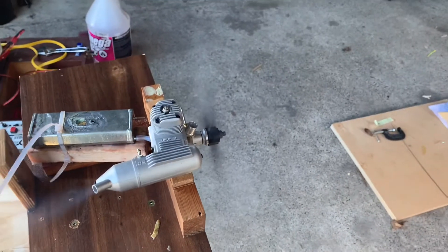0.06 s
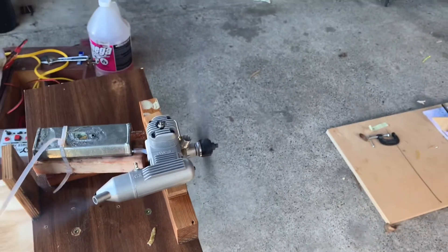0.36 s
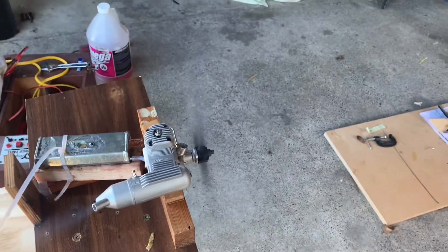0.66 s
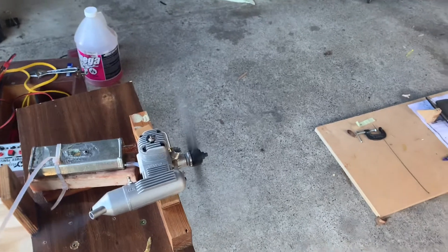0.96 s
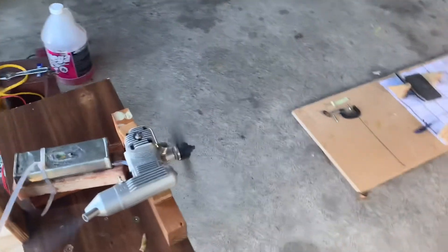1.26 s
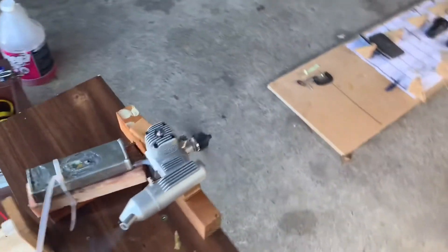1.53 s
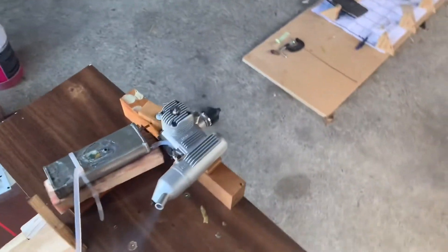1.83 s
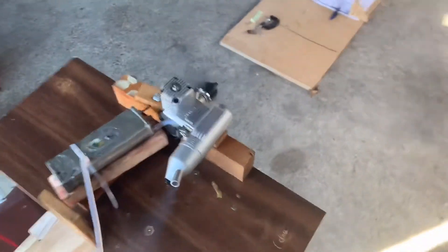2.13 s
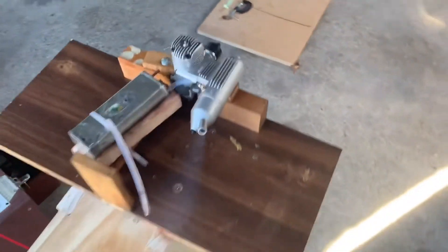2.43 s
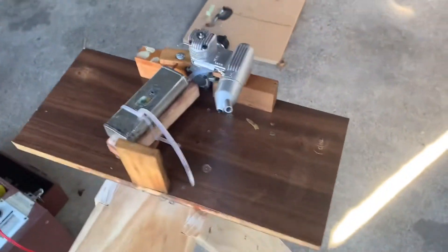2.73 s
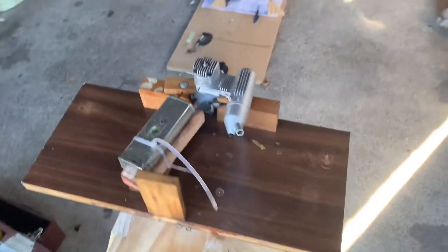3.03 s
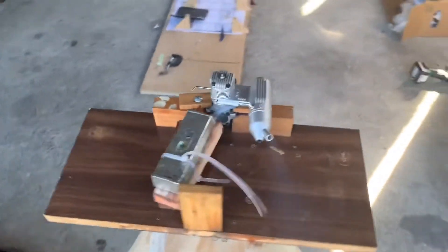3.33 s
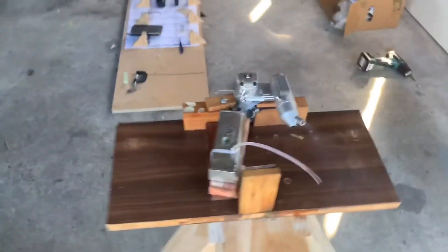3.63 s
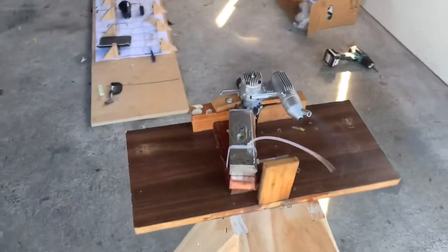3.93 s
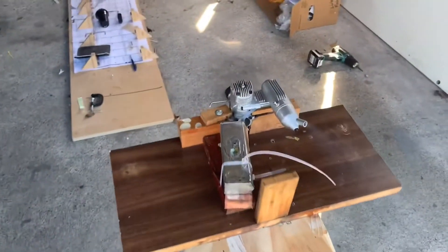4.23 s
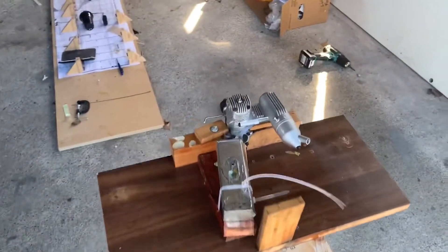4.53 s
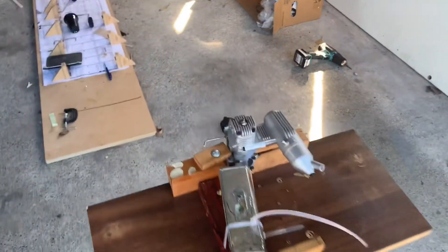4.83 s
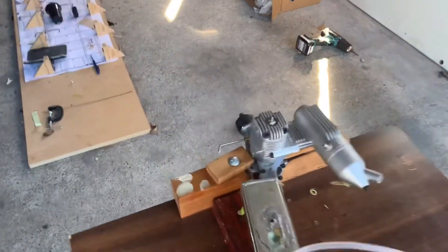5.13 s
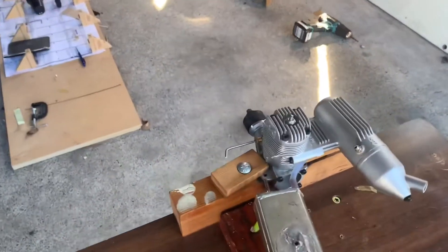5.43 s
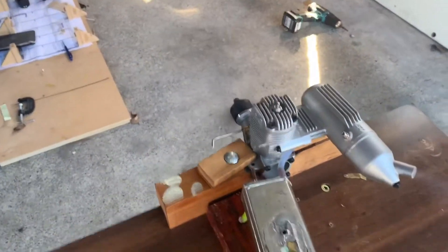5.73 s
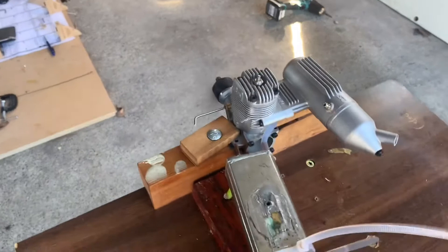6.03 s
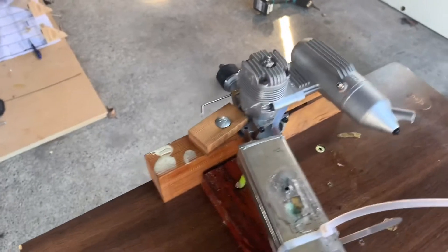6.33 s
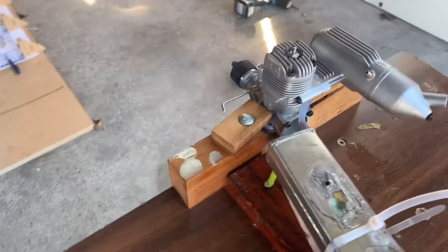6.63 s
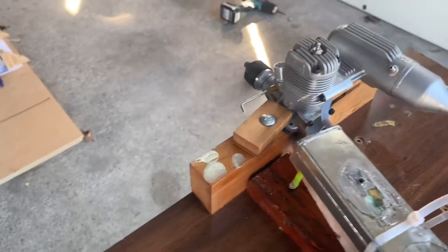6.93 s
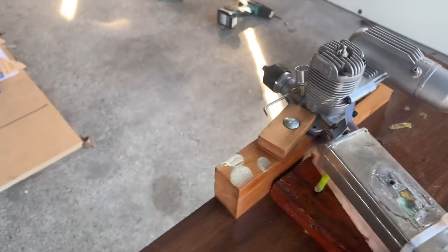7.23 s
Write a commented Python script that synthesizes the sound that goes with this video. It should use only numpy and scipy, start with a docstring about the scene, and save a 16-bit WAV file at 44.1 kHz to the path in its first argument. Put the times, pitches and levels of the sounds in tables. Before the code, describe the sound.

A little propeller engine buzzes loudly and continuously, its rapid exhaust pops slightly uneven and its pitch barely wavering. Bright hiss rides on top, with a short garage echo around it. As the listener walks from its side to its rear, the sound briefly sharpens, then takes on a metallic edge. Near the end the microphone leans in, and the drone becomes fuller and louder, with light buffeting from the propeller's air.

```python
"""A small two-stroke model engine spins a two-blade propeller on a board in a garage, 150 turns a second.
From the start it runs rich (too much fuel): strong and weak firings tend to alternate, each with an
exhaust pop and a spit of hiss. The listener sets off from beside it, passing a sizzle and a hard crack
just before 2 s. Further round the crack turns metallic. From about 5 s the listener leans in close
behind, where the blades hum louder and their wind buffets the microphone."""
import sys
import numpy as np
from scipy import signal
from scipy.fft import rfft, irfft, next_fast_len
from scipy.io import wavfile
from scipy.ndimage import uniform_filter1d, map_coordinates

SR = 44100
rng = np.random.default_rng(int(sys.argv[2]) if len(sys.argv) > 2 else 0)


def transcribe(u):
    """Save the signal u as a 16-bit wav file named by the first command-line argument.

    u: samples, shape (n,) or (channels, n), limited to [-1, 1]; the rate is SR.
    q: integer samples, one column per channel.
    """
    v = np.clip(np.atleast_2d(u).T, -1, 1)
    q = np.round(v * 32767).astype(np.int16)
    wavfile.write(sys.argv[1], SR, q)


N = 324576
LEFT_RIGHT = np.array([[.5], [-.5]])  # shares out a difference: half up on the left, half down on the right


def amp(db):
    """Turn decibels into a gain."""
    return 10 ** (np.asarray(db) / 20)

def unit(x):
    """Scale to an average (rms) size of 1."""
    return x / np.sqrt(np.mean(x ** 2) + 1e-20)

def steady(x, size=8192):
    """Hold the slowly changing level of x at rms 1."""
    return x / np.sqrt(abs(uniform_filter1d(np.mean(x ** 2, axis=0), size)) + 1e-12)

def past(x, edge, span):
    """A soft step from 0 to 1 as x passes the edge."""
    return (1 + np.tanh((x - edge) / span)) / 2

def along(points, hz):
    """Read a frequency table between its rows, on a log scale."""
    f, v = np.transpose(points)
    return np.interp(np.log(hz + 1), np.log(f + 1), v)

def curves(rows):
    """Read a time table: one value per sample for each column after the time."""
    s, *cols = np.transpose(rows)
    return [np.interp(np.arange(N) / SR, s, c) for c in cols]

def wobble(rate):
    """A smooth random curve through `rate` points a second."""
    return map_coordinates(rng.standard_normal(int(N * rate / SR) + 4), [np.arange(N) * rate / SR])

def delayed(x, ms):
    """Delay a mono sound by a changing amount."""
    return map_coordinates(x, [np.arange(N) - ms * SR / 1000], order=3)

def filtered(x, response):
    """Multiply each frequency in x by response(hz)."""
    m = next_fast_len(N + SR // 2)
    return irfft(rfft(x, m) * response(np.fft.rfftfreq(m, 1 / SR)), m)[..., :N]

def coloured(x, spectrum, size=8192):
    """Give x a tone colour, with a filter that rings after each hit and never before."""
    cepstrum = irfft(np.log(amp(along(spectrum, np.fft.rfftfreq(size, 1 / SR)))))
    cepstrum[1:size // 2] *= 2
    cepstrum[size // 2 + 1:] = 0
    return signal.fftconvolve(x, irfft(np.exp(rfft(cepstrum)))[None], axes=1)[:, :N]

def pulses(at, sizes, order=8):
    """Clicks at positions that may fall between samples."""
    taps = np.floor(at)[:, None].astype(int) + np.arange(1 - order, order + 1)
    off = taps - at[:, None]
    shape = sizes[:, None] * np.sinc(off) * np.cos(np.pi * off / (2 * order)) ** 2
    return np.bincount(np.clip(taps, 0, N).ravel(), shape.ravel(), N + 1)[:N]


# the listener's path: (time [s], angle round the engine from its side [degrees], distance [m])
WALK = [(0, -8, 0.58), (.7, 3, 0.69), (2.1, 46.5, 0.57), (2.75, 52, 0.61), (3.7, 91, 0.75),
        (4.6, 91.5, 0.64), (5.4, 113, 0.42), (6.5, 123, 0.42), (7.36, 125, 0.41)]

def viewpoint():
    """The listener's angle in degrees, and nearness in dB (0 at half a metre)."""
    angle, distance = curves(WALK)
    return angle, 20 * np.log10(0.5 / distance)

def views():
    """How much the listener is beside, diagonally behind, behind and close behind the engine."""
    angle = viewpoint()[0]
    beside = 1 - past(angle, 45.6, 0.37)
    rear, close = past(angle, 78, 13), past(angle, 93, 7.3)
    return [beside, 1 - beside - rear, rear - close, close]

def beam(best_deg, width_deg):
    """How far the listener stands inside a narrow beam of sound, 0 to 1."""
    return np.exp(-((viewpoint()[0] - best_deg) / width_deg) ** 2)


# the exhaust outlet drifts from left to right: (time [s], head start of the left side [ms])
OUTLET_LEAD = [(0, .17), (1.4, 0.17), (2.1, 0.12), (2.7, 0.078), (3.6, 0.036), (4.8, 0.044), (5.4, -0.058),
               (7.36, -0.044)]

def from_outlet(x):
    """Sound from the outlet reaches the nearer ear first."""
    lead_ms, = curves(OUTLET_LEAD)
    return np.array([delayed(x, -lead_ms / 2), delayed(x, lead_ms / 2)])


# how long the garage echoes: (frequency [Hz], time to fade by 60 dB [s])
ECHO_TIME = [(150, 0.069), (1500, 0.44), (6000, 0.26), (14000, 0.022)]

def garage(x, wet_db, count):
    """The direct sound plus the walls' echo, which blends through `count` spots along the walk."""
    hz, t, noise = signal.stft(rng.standard_normal((count, 2, SR // 3)), SR, nperseg=256)
    tails = signal.istft(noise * amp(-60 * t / along(ECHO_TIME, hz)[:, None]), SR)[1]
    place = np.linspace(0, count - 1, N)
    echo = 0
    for k, tail in enumerate(tails):
        share = np.sqrt(np.clip(1 - abs(place - k), 0, 1))
        echo = echo + share * signal.oaconvolve(x[None], tail / np.linalg.norm(tail[0]), axes=1)[:, :N]
    return x + amp(wet_db) * echo


# the rich mixture makes the speed wander: (time [s], speed [turns per second])
SHAFT_SPEED = [(0.0, 148.0), (0.08, 149.8), (0.17, 147.5), (0.23, 147.4), (0.28, 149.8), (0.35, 149.9),
               (0.41, 148.8), (0.53, 149.0), (0.71, 151.3), (0.8, 149.8), (0.9, 149.8), (1.0, 146.2),
               (1.04, 148.0), (1.17, 148.3), (1.32, 152.2), (1.35, 149.1), (1.41, 148.5), (1.48, 148.9),
               (1.55, 151.2), (1.62, 149.8), (1.71, 150.1), (1.75, 147.4), (1.82, 149.8), (1.86, 148.9),
               (2.01, 150.3), (2.1, 147.5), (2.17, 147.7), (2.21, 150.7), (2.29, 149.8), (2.36, 150.6),
               (2.41, 149.3), (2.47, 150.9), (2.58, 148.8), (2.68, 148.8), (2.72, 147.5), (2.8, 150.6),
               (2.85, 150.9), (2.92, 148.7), (3.04, 150.9), (3.23, 148.2), (3.31, 149.3), (3.37, 148.2),
               (3.42, 149.5), (3.56, 148.2), (3.68, 149.7), (3.8, 149.4), (3.85, 150.2), (3.95, 150.3),
               (4.01, 151.8), (4.11, 149.7), (4.22, 151.6), (4.28, 148.8), (4.35, 148.7), (4.44, 152.2),
               (4.5, 149.7), (4.6, 150.0), (4.64, 147.9), (4.74, 151.7), (4.87, 149.4), (4.97, 151.7),
               (5.05, 149.8), (5.11, 151.5), (5.28, 147.1), (5.37, 147.8), (5.49, 151.4), (5.64, 148.5),
               (5.69, 148.6), (5.84, 151.0), (5.9, 149.2), (5.95, 150.1), (5.99, 147.5), (6.1, 151.2),
               (6.17, 149.6), (6.21, 147.2), (6.36, 150.3), (6.45, 148.4), (6.56, 150.8), (6.6, 149.9),
               (6.77, 151.6), (6.91, 150.9), (6.98, 146.5), (7.05, 148.6), (7.26, 152.3), (7.36, 148.1)]

def shaft():
    """The shaft's speed, and its running count of turns with a slight jitter."""
    speed, = curves(SHAFT_SPEED)
    return speed, np.cumsum(speed * (1 + 0.001223 * wobble(40))) / SR

def firings(turns, swap_rate=2.5, seesaw_share=0.66, chance=0.52):
    """One burn a turn: its position in samples and its strength (above 0 strong, below 0 weak)."""
    at = np.interp(np.arange(1, int(turns[-1])), turns, np.arange(N))
    # a strong burn leaves spent gas that weakens the next; now and then the pattern slips by one turn
    seesaw = np.cos(np.pi * np.arange(len(at))) * np.tanh(3 * wobble(swap_rate))[at.astype(int)]
    luck = rng.standard_normal(N // 100)[:len(at)]
    return at, unit(np.tanh(seesaw_share * seesaw + chance * luck))  # one charge of fuel caps a burn


# Tone k has k cycles per turn. The levels in these tables are relative: the mix shifts them.
# tone 2, the blades' hum, swells close behind the propeller: (time [s], level [dB])
BLADE_HUM = [(0, -34), (1.15, -34), (1.8, -43.5), (3.0, -39), (4.0, -44.5), (4.7, -35.5), (5.1, -24.5),
             (6.3, -22), (7.36, -18.5)]
# tone 4, the muffler's hoot: (time [s], level [dB])
MUFFLER_HOOT = [(0, -31.5), (.7, -33.5), (2.0, -31), (2.35, -28), (2.8, -30.5), (4.6, -26.2), (5.5, -22.5),
                (6.7, -22.5), (7.36, -25)]
# tones 3, 5 and 6 cross the garage's loud and quiet spots (standing waves): (time [s], level [dB])
TONE_3 = [(0.0, -38.5), (0.7, -37.5), (1.14, -43), (1.28, -37.5), (2.12, -38.5), (2.49, -34.5),
          (3.35, -37.5), (4.61, -39.5), (5.01, -45), (5.27, -38.5), (5.99, -38.5), (6.45, -39.0),
          (6.8, -54), (7.06, -40.0), (7.34, -55)]
TONE_5 = [(0.0, -33.5), (0.42, -42), (0.74, -38), (1.3, -38.5), (1.519, -41.5), (2.35, -49), (2.59, -39),
          (2.81, -42), (3.57, -34.5), (4.37, -34), (4.83, -38.5), (5.41, -31), (6.23, -31), (7.34, -33)]
TONE_6 = [(0.0, -37), (0.6, -39.5), (0.84, -40.5), (1.92, -31.5), (2.57, -41), (2.77, -35), (3.31, -36),
          (3.67, -44), (4.13, -41), (4.33, -57), (4.51, -42), (4.809, -37.5), (5.148, -39), (5.33, -54),
          (5.79, -37), (6.27, -49), (6.6, -39), (7.34, -34)]
# standing waves make the left louder than the right by this much:
# (time [s], tone 2 [dB], tones 3, 4 and 6 [dB], tone 5 [dB])
TONE_BALANCE = [(0.0, 0.5, 13, 7.6), (1.4, 1, 12, 2), (2.0, -10, 10.5, 1), (2.5, -12, 2, 1),
                (3.0, -20, 0, 1.8), (3.6, -5, 0, 0.98), (4.4, 5, -3, 2.1), (5.0, 5.5, -0.5, 1.8),
                (5.6, 8, -2, 1.297), (6.4, 7, -3.5, 2.7), (7.36, 3, -9.5, 4.4)]

def drone(turns, speed, at, burn, flutter_db=0.65, throb_db=0.94):
    """Exhaust and propeller hum six pure tones; those above the blades' hum throb with the burns."""
    angle, near_db = viewpoint()
    thrum_db = -32.5 + 1.96 * near_db + 2.5 * np.cos(2 * np.pi * (angle - 12) / 168)  # tone 1: a wide beam
    levels = [thrum_db] + [curves(rows)[0] for rows in (BLADE_HUM, TONE_3, MUFFLER_HOOT, TONE_5, TONE_6)]
    blade_pan, exhaust_pan, fifth_pan = curves(TONE_BALANCE)
    pans = [0, blade_pan, exhaust_pan, exhaust_pan, fifth_pan, exhaust_pan]
    lead_ms = 0.032 + 0.198 * views()[0]  # the left ear's head start is longest beside the engine
    burn_now = np.interp(np.arange(N), at, burn)
    hum = 0
    for k, (db, pan) in enumerate(zip(levels, pans), 1):
        # shorter waves differ more between the two ears
        apart = k * (2 * np.pi * speed * lead_ms / 1000 + 0.11 * wobble(0.94))
        phase = 2 * np.pi * (k * turns + rng.random()) + LEFT_RIGHT * apart
        balance = amp(LEFT_RIGHT * pan) / np.sqrt((amp(pan) + amp(-pan)) / 2)
        gain = amp(db + flutter_db * wobble(90) + (k > 2) * throb_db * burn_now)
        hum = hum + np.sqrt(2) * gain * balance * np.sin(phase)
    return hum


# the deep ring of muffler and board: (frequency [Hz], level [dB])
BOOM_COLOUR = [(30, -32), (72, -4.5), (125, -1), (190, -6.5), (225, 2), (290, -3), (370, -8), (520, 1),
               (670, 0), (830, -5.5), (980, -5), (1130, -18), (2000, -40)]

def boom(at, burn):
    """Uneven burns thump the board, sounding at half the shaft's rate."""
    return steady(coloured(garage(pulses(at, burn), wet_db=-23.5, count=3), BOOM_COLOUR))


# the muffler's ring from four sides: (frequency [Hz], level [dB])
MUFFLER_BESIDE = [(560, -41), (950, 17.5), (1060, -1.5), (1190, 3), (1350, 2.5), (1500, -0.5), (1640, -4.5),
                  (1930, 6.5), (2260, -0.5), (2550, 0.5), (2700, -7), (2860, -1.5), (3320, -8.5),
                  (4200, -6.5), (5460, -33), (9240, -120)]
MUFFLER_DIAGONAL = [(560, -43), (950, -2), (1200, 1), (1480, 4), (1650, -5), (1830, 4.5), (2100, -1.5),
                    (2400, 4), (2550, -18), (2680, 5), (2860, 0.5), (2990, -23), (3140, 1), (3500, -23),
                    (5200, -21), (8800, -120)]
MUFFLER_BEHIND = [(560, -36), (950, -7), (1050, -11), (1200, 0.5), (1340, 3), (1510, 10.5), (1800, -1.5),
                  (2090, 4), (2250, -24), (2400, -1), (2550, -14), (2860, 8), (3000, -8), (3300, 1.5),
                  (4000, -23), (5200, -24), (8800, -120)]
MUFFLER_CLOSE = [(560, -40.5), (950, 0), (1050, -4.5), (1340, -7), (1520, 6), (1670, 2), (1910, -9),
                 (2110, 0.5), (2260, -15.5), (2400, -3.5), (2670, -11), (2860, -2.5), (3000, -19.5),
                 (3150, -5.5), (3300, -5.5), (4000, -22), (5200, -40), (8800, -120)]

def exhaust_pops(at, burn, uneven_db=1.1, low_cut_hz=985):
    """A sharp pop each time the exhaust port opens, ringing in the muffler."""
    shares = views()
    pops = pulses(at, amp(uneven_db * burn))
    walls = garage(pops, wet_db=-10.5, count=5) - pops
    heard = filtered(from_outlet(pops) + walls, lambda hz: past(hz, low_cut_hz, 50))
    colours = [MUFFLER_BESIDE, MUFFLER_DIAGONAL, MUFFLER_BEHIND, MUFFLER_CLOSE]
    ringing = sum(share * unit(coloured(heard, colour)) for share, colour in zip(shares, colours))
    side_gain = amp(shares[0] * (-2 + 2.5 * LEFT_RIGHT))  # from beside: softer, and more to the left
    return side_gain * steady(ringing) * amp(1.6 * LEFT_RIGHT)


# the pops' low range, a bark: (time [s], relative level [dB])
BARK_LEVEL = [(0.0, -37.5), (0.16, -40.5), (0.66, -39), (0.96, -42), (1.06, -40.5), (1.54, -37.5),
              (2.2, -39), (2.75, -39), (3.53, -45.5), (4.15, -46), (4.49, -47.5), (4.81, -41.5),
              (5.27, -44), (5.49, -36), (5.65, -46), (5.85, -37.5), (5.99, -42), (6.09, -36), (6.25, -42),
              (6.66, -35.5), (6.98, -40), (7.12, -37), (7.34, -41)]
# the pops' middle range, a nasal whine: (time [s], relative level [dB])
WHINE_LEVEL = [(0.0, -35), (0.18, -41), (0.28, -44), (0.78, -38), (1.82, -41), (2.06, -43), (2.12, -39),
               (2.95, -40), (3.11, -45), (3.31, -40.5), (3.85, -38.5), (3.95, -42), (4.35, -36),
               (4.55, -45), (4.65, -35), (4.81, -48), (4.97, -33.5), (5.37, -39.5), (5.49, -30.5),
               (5.65, -34.5), (5.85, -31), (5.99, -39.0), (6.09, -30.5), (6.19, -35.5), (6.51, -31.5),
               (7.34, -36)]

def bark_and_whine(pops, bark_top_hz=1420, whine_top_hz=1730):
    """The pops' bark and whine swell on their own; only the treble keeps the level it came with."""
    treble = filtered(pops, lambda hz: past(hz, whine_top_hz, 30))
    bark = filtered(pops, lambda hz: 1 - past(hz, bark_top_hz, 30))
    whine = pops - treble - bark
    bark = amp(curves(BARK_LEVEL)[0] - 1.5 + 2 * LEFT_RIGHT) * steady(bark, size=4096)
    whine = amp(curves(WHINE_LEVEL)[0] - 0.5) * steady(whine, size=4096)
    return treble + bark + whine

def gas_puffs(at, burn, uneven_db, decay_s, leak):
    """Escaping gas: noise that swells with each firing and dies within the turn to a steady leak."""
    t = np.arange(SR // 50) / SR
    puff = t / decay_s * np.exp(1 - t / decay_s)
    flow = signal.oaconvolve(pulses(at, amp(uneven_db * burn)), puff)[:N]
    return np.hypot(flow, leak) * rng.standard_normal(N)


# the lower range of the gas jet's hiss: (frequency [Hz], level [dB])
JET_COLOUR = [(800, -48), (1900, -5.5), (2900, -1.5), (3800, -4.5), (4500, -5), (5600, -3), (7000, 1),
              (7600, -0.5), (8100, -22.5)]

def jet(at, burn):
    """Gas hisses from the outlet; facing the outlet, less of it is heard off the walls."""
    gas = gas_puffs(at, burn, uneven_db=3.4, decay_s=0.00047, leak=0.16)
    beside = views()[0]
    walls = amp(1.5 * beside) * (garage(gas, wet_db=-1, count=2) - gas)
    hiss = steady(coloured(from_outlet(gas) + walls, JET_COLOUR), size=2048)
    return hiss * amp(-0.5 * (2 - beside) * LEFT_RIGHT)


# the top range of the hiss: (frequency [Hz], level [dB])
SPIT_COLOUR = [(6000, -23.5), (7200, -13), (8000, -20), (8800, 2), (9400, -1.5), (10100, -5), (11000, -4),
               (12000, -2.5), (12700, 3), (13200, 0), (13800, -53), (14800, -50), (15700, -6), (16200, -35)]
# the hiss bounces off the board, so its colour sweeps during the walk: (time [s], echo delay [ms])
BOARD_ECHO = [(0, .792), (1.1, .788), (1.5, .85), (2.0, .8), (2.7, .91), (3.5, .84), (4.3, .84), (4.9, .9),
              (7.36, .92)]
# two metallic rings of the engine: (frequency [Hz], level [dB])
LOW_RING = [(5000, -69), (6500, 4), (7050, 24), (7600, -31), (9000, -34)]
HIGH_RING = [(7000, -31), (9300, -19), (10100, -2), (10900, -19), (13000, -55)]
# each ring is heard best from its own side: (time [s], low ring [dB], high ring [dB])
RING_LEVELS = [(0, -54, -33), (1.099, -70, -35), (1.6, -62, -42), (2.7, -51, -45), (3.5, -42.5, -40),
               (5, -57, -68), (7.36, -40.5, -79)]
# the ears get the hiss in and out of step: (frequency [Hz], lead of the left side [degrees])
EAR_PHASE = [(6800, 360), (7800, 182), (8900, 178), (10500, 0), (11700, 0), (13300, -175), (14300, -185),
             (14900, -360)]

def spit(at, burn, level_db, board_share=0.22):
    """Each firing spits bright hiss and rings the metal, with a little echo from the walls."""
    gas = gas_puffs(at, burn, uneven_db=2.5, decay_s=.0011, leak=.48)
    gas = gas + board_share * delayed(gas, curves(BOARD_ECHO)[0])
    top = amp(level_db) * steady(coloured(gas[None], SPIT_COLOUR)) + loud_spits()
    for ring_db, ring in zip(curves(RING_LEVELS), [LOW_RING, HIGH_RING]):
        knocks = gas_puffs(at + 0.00035 * SR, burn, uneven_db=1.0, decay_s=0.00031, leak=0.1)
        top = top + amp(ring_db) * unit(coloured(knocks[None], ring))
    heard = garage(top[0], wet_db=-9, count=2)[:1]
    return filtered(heard, lambda hz: np.exp(1j * np.radians(along(EAR_PHASE, hz)) * LEFT_RIGHT))

def air(spectrum, alike):
    """Rushing air: stereo noise with a given colour and likeness between left and right."""
    def response(hz):
        spread = np.arccos(np.clip(along(alike, hz), -1, 1)) / 2
        return amp(along(spectrum, hz)) * [np.cos(spread), np.sin(spread)]
    mid, side = filtered(rng.standard_normal((2, N)), response)
    return unit(np.array([mid + side, mid - side]))


# air churned by the propeller: (frequency [Hz], level [dB])
CHURN_COLOUR = [(50, -24), (128, -21), (185, 3.5), (245, 1.5), (285, -12.5), (350, -1), (600, -11),
                (900, -6), (1200, -13.5), (2500, -13.5), (4000, -62), (8000, -37)]
# how alike that air sounds left and right: (frequency [Hz], likeness [0 to 1])
CHURN_ALIKE = [(100, 0.94), (250, 0.93), (600, 0.1), (1500, 0.21), (4000, 0.035)]
# wind rumbling on the microphone: (frequency [Hz], level [dB])
BUFFET_COLOUR = [(20, -29), (45, -7), (65, -1), (100, 0), (130, -21), (250, -61)]

def propeller_wind():
    """The blades churn the air, and their wind buffets the microphone more towards the rear."""
    angle, near_db = viewpoint()
    churn = amp(-34 + 0.25 * near_db) * air(CHURN_COLOUR, CHURN_ALIKE)
    buffet_db = -57.5 + 0.29 * near_db + 0.3 * (angle - angle.mean())
    return churn + amp(buffet_db) * air(BUFFET_COLOUR, alike=[(60, 0.75)])

def crack(at, burn, colour, uneven_db, ahead_ms=0.84):
    """A dry crack, loudest on strong firings, that arrives before the pop is through the muffler."""
    cracks = pulses(at - ahead_ms * SR / 1000, amp(uneven_db * burn))
    return unit(from_outlet(coloured(cracks[None], colour)[0]))


# the hard, narrow crack from the muffler's side: (frequency [Hz], level [dB])
SIDE_CRACK_COLOUR = [(1000, -25), (1500, -14), (1850, -3), (2250, 0), (2400, 5), (2520, -8), (2700, -24),
                     (4000, -40)]

def side_crack(at, burn):
    """Beside the engine the firings crack, hardest in one beam off the muffler."""
    gain = views()[0] * (amp(-41) + amp(-35.5) * beam(best_deg=39, width_deg=12))
    return gain * crack(at, burn, SIDE_CRACK_COLOUR, uneven_db=2.2)


# the part of the jet's hiss that beams to the side: (frequency [Hz], level [dB])
SIZZLE_COLOUR = [(3800, -26), (4700, 6), (5300, -6), (6200, -2), (7000, -33)]

def sizzle(hiss):
    """The jet sizzles as the listener walks through one narrow beam."""
    bright = filtered(hiss, lambda hz: amp(along(SIZZLE_COLOUR, hz)))
    return amp(-3.5) * beam(best_deg=32, width_deg=10.5) * bright


# now and then the engine spits much louder: (time [s], level [dB])
LOUD_SPITS = [(1.775, -22), (2.585, -22), (2.906, -19), (3.148, -23), (5.005, -19), (6.434, -19)]

def loud_spits(decay_s=0.0018):
    """Single short bursts of the brightest hiss."""
    s, db = np.transpose(LOUD_SPITS)
    t = np.arange(SR // 100) / SR
    bursts = signal.oaconvolve(pulses(s * SR, amp(db)), t / decay_s * np.exp(1 - t / decay_s))[:N]
    return bursts * unit(coloured(rng.standard_normal((1, N)), SPIT_COLOUR))


# the metallic crack from behind: (frequency [Hz], level [dB])
REAR_CRACK_COLOUR = [(2200, -30), (2550, -10.5), (2950, -8), (3170, -1), (3480, 9), (3750, -9), (4500, -36),
                     (6000, -44)]

def rear_crack(at, burn, effort_db):
    """Once the listener leaves the side, strong firings crack with a metallic edge."""
    angle, near_db = viewpoint()
    in_view = (1 - views()[0]) * past(angle, 52, 16)
    gain = amp(-44 + 0.6 * near_db + 0.46 * effort_db)
    return in_view * gain * crack(at, burn, REAR_CRACK_COLOUR, uneven_db=2.0)


# at times the engine clears its throat, and the pops even out: (time [s], clean firing [0 to 1])
CLEAN_FIRING = [(0, 0.4), (1.15, 0.6), (2.12, 0), (2.2, 1), (2.52, 0.1), (3.7, 0), (5.36, 0), (5.47, 0.6),
                (5.72, 0), (6.5, 1), (7.36, 0.6)]

def scene():
    """One shaft times the hum, exhaust and hiss; the propeller's wind blows over them."""
    speed, turns = shaft()
    at, burn = firings(turns)
    near_db = viewpoint()[1]
    clean, = curves(CLEAN_FIRING)
    # a better burn both speeds the shaft and sharpens the pops
    effort_db = 1.1 * (speed - speed.mean()) + 2.5 * clean
    evened_burn = burn * (1 - 0.38 * clean[at.astype(int)])
    wind = propeller_wind()
    pops = bark_and_whine(amp(-32 + 0.68 * near_db + effort_db) * exhaust_pops(at, evened_burn))
    thumps = amp(-39.5 + 0.25 * near_db) * boom(at, burn)
    cracks = side_crack(at, burn) + rear_crack(at, burn, effort_db)
    gas = jet(at, burn)
    hiss = amp(-35 + 0.62 * near_db) * (gas + sizzle(gas)) + spit(at, burn, level_db=-27.5 + near_db)
    hum = amp(-1.8) * drone(turns, speed, at, burn)
    return hum + thumps + pops + hiss + wind + cracks

def record(dry, top_hz=16050):
    """Cut away the very highest treble."""
    return filtered(dry, lambda hz: hz < top_hz)


dry = scene()
out = record(dry)
transcribe(out)
```